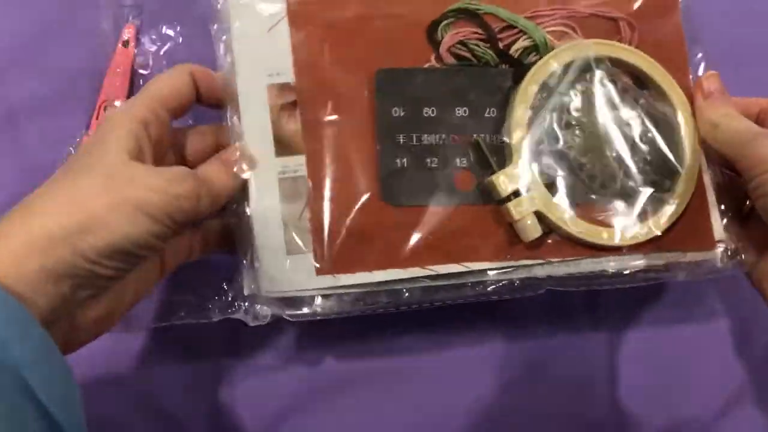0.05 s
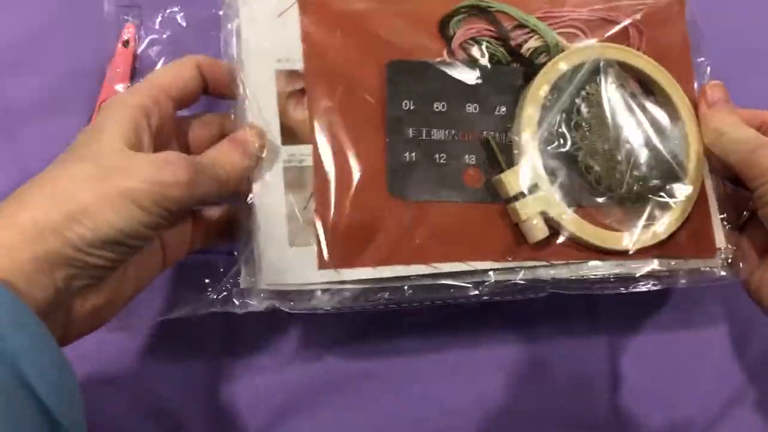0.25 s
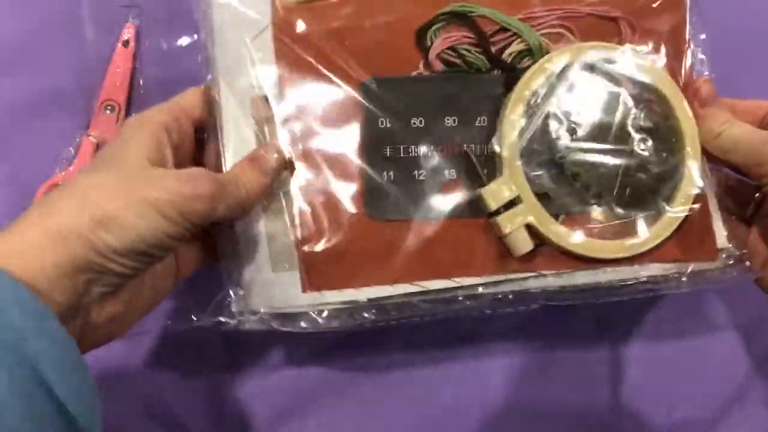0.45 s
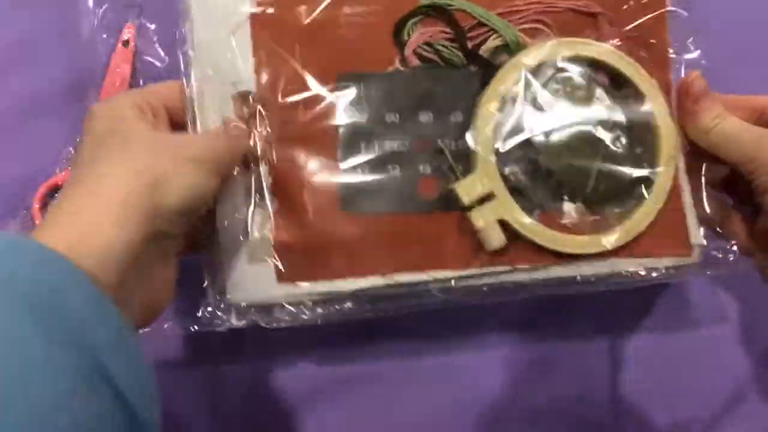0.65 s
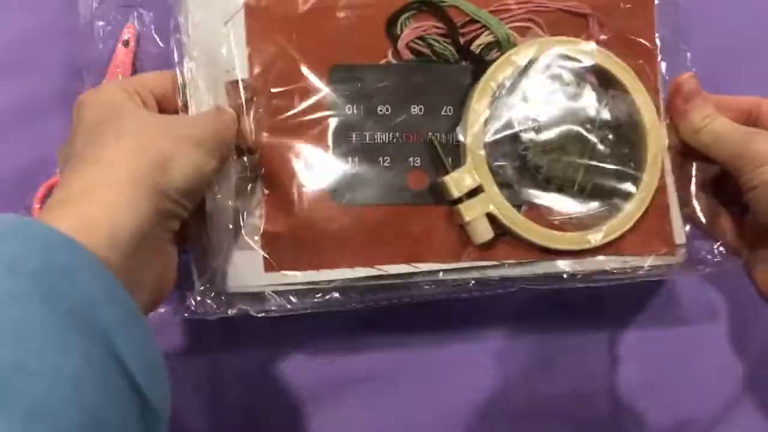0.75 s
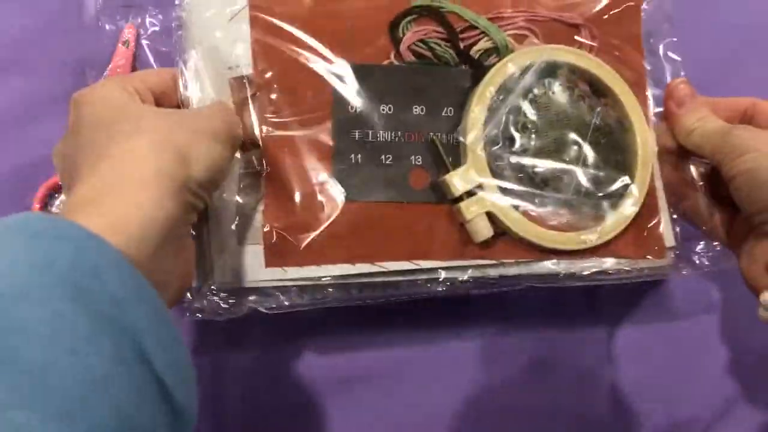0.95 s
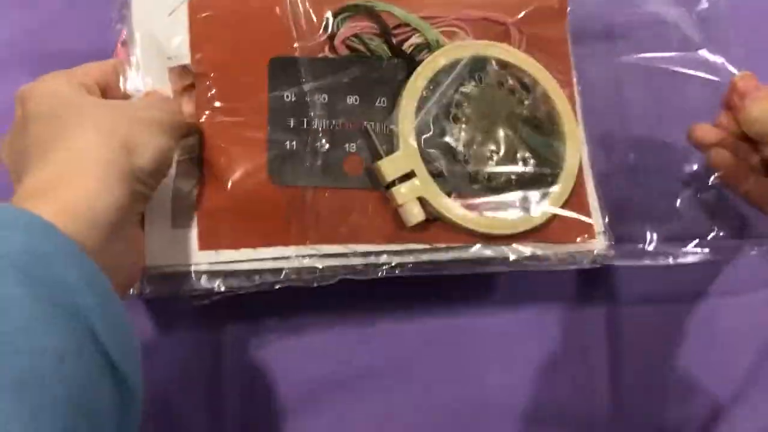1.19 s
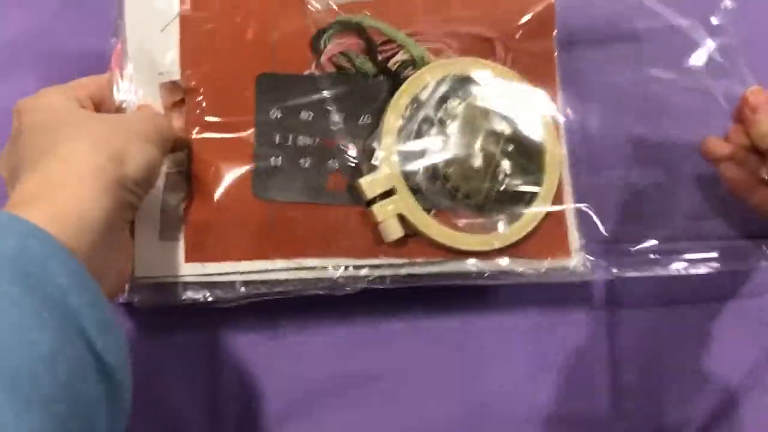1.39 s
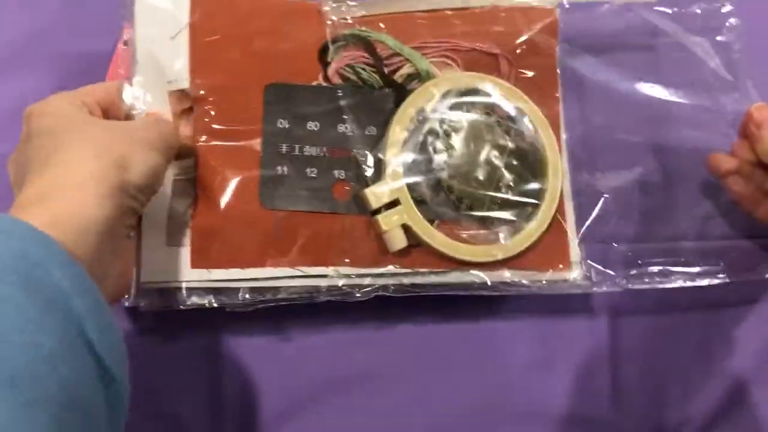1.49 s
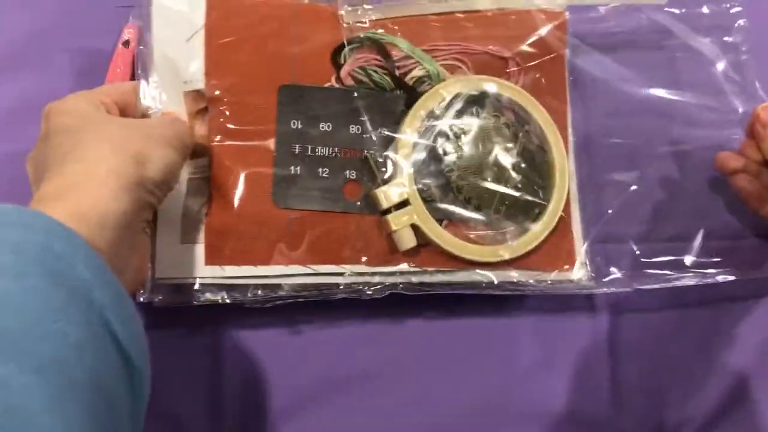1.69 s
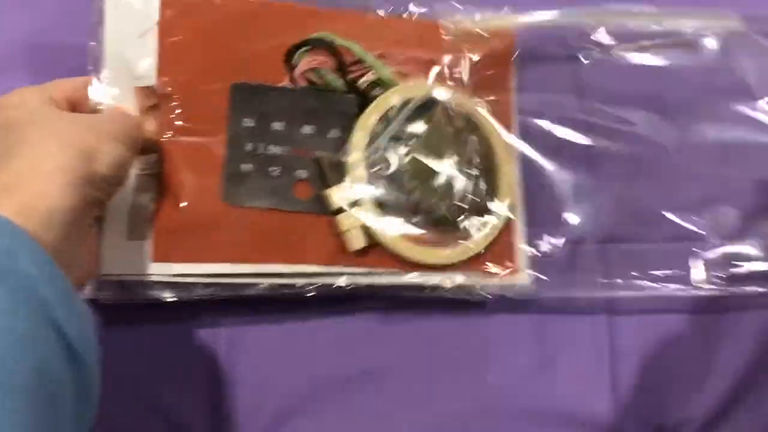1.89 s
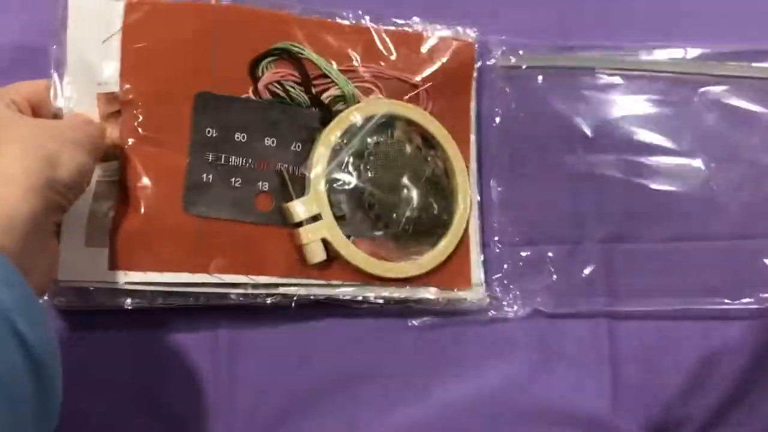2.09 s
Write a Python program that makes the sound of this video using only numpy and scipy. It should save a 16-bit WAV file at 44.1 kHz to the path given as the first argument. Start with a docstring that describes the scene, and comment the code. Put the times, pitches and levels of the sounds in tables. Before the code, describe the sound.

A stiff clear plastic bag crinkles sharply in hands, snapping and rustling close by in a room

```python
"""Creases in a clear, stiff plastic bag buckle with sharp snaps as two hands slide a craft kit out of it, close by.
Each snap rings random film modes; broad panels flip over with dull pops, decaying within a few cycles.
While the contents slide, swelling noise makes the film hiss and the packet rustle low, and tiny rings crackle.
Stray ticks persist between slides. Echoes and a short tail form a small, dry room with faint rumble and air."""
import sys
import numpy as np
from scipy import signal
from scipy.fft import rfft, irfft, next_fast_len
from scipy.io import wavfile
from scipy.ndimage import map_coordinates

SR = 44100
rng = np.random.default_rng(int(sys.argv[2]) if len(sys.argv) > 2 else 0)


def digitize_waveform(pressure):
    """Quantize a signal to 16-bit integers and store it at the path in sys.argv[1].

    Rows of a 2-D input are taken as channels; values are limited to [-1, 1].
    """
    field = np.atleast_2d(pressure).T
    bounded = np.clip(field, -1, 1)
    quanta = np.round(bounded * 32767).astype(np.int16)
    wavfile.write(sys.argv[1], SR, quanta)


N = 94329

# Buckling creases: start_s, level_db, bright_edge_db (against the crack), pitch_hz
CREASE_SNAPS = [(0.06, -40, -13, 5330), (0.0881, -36.5, -16, 6400), (0.0961, -31, -10.0, 6440),
                (0.0994, -40, -16, 6860), (0.155, -41, -19, 4470), (0.1642, -30, -4, 5300),
                (0.1787, -31, 3.0, 6140), (0.2222, -31.0, -9.5, 4700), (0.2315, -45, -11, 4500),
                (0.2511, -26.5, -22.0, 6140), (0.2736, -29, -1, 4160), (0.2787, -25, -7.5, 4870),
                (0.2854, -28.5, -30, 6200), (0.3057, -38, -5.0, 4000), (0.314, -36.5, -7.0, 4000),
                (0.3185, -22.5, -5, 5200), (0.3317, -35.5, -22.0, 2620), (0.3367, -29, 4.5, 3600),
                (0.3432, -29, 2, 6100), (0.3639, -27, -23, 5140), (0.394, -27.5, -16, 4500),
                (0.415, -33.5, -0.5, 4660), (0.421, -42, -16, 3860), (0.5133, -29.5, -18, 7740),
                (0.5245, -30, 0, 3850), (0.543, -36, -20.0, 6200), (0.5609, -42, -4, 2000),
                (0.5718, -37.5, -3, 5800), (0.5853, -36.5, -22.0, 4000), (0.595, -30.5, -6, 3830),
                (0.615, -27, -8.0, 4740), (0.618, -27.5, -3, 4470), (0.6369, -44, 8, 5000),
                (0.6495, -32.5, -3, 2140), (0.6612, -32, -14, 6150), (0.6658, -37, -4.0, 4700),
                (0.6891, -38.5, -1, 3400), (0.6925, -34.5, 0.5, 3340), (0.6993, -37, -2, 3200),
                (0.7166, -41.5, 6, 4930), (0.7505, -33.5, -28, 2370), (0.759, -34, -27, 5300),
                (0.7795, -39.5, -15, 4540), (0.7966, -32, -3, 4370), (0.8096, -42.0, -13, 7300),
                (0.8299, -34, -4, 4770), (0.8316, -34, -9, 3300), (0.8437, -30, 0.5, 5600),
                (0.8611, -38, 2, 5500), (0.9046, -35.5, -26, 4670), (0.9197, -31.5, -6, 1990),
                (0.9248, -38, -11, 6900), (0.9394, -26, -2, 4500), (0.948, -31.5, 3.5, 4970),
                (0.959, -30, 4, 1760), (0.9738, -26, -2.5, 6900), (0.993, -24.5, -14, 6060),
                (1.0063, -28, 2, 2780), (1.0212, -25.5, -4, 5700), (1.0368, -25.5, -10, 5160),
                (1.0607, -30, -22.0, 7200), (1.067, -24.5, -26, 7900), (1.0832, -30.5, -24, 6840),
                (1.1387, -38, -2.5, 4000), (1.1448, -38, -19, 3900), (1.2108, -35, -22, 5400),
                (1.2164, -38.5, -9.0, 4700), (1.2583, -25.5, -12, 5670), (1.2728, -33, -22.0, 4500),
                (1.2917, -44, -3, 2930), (1.3428, -45.5, 7, 3130), (1.4296, -49, -10, 3400),
                (1.47, -40.5, -20, 8150), (1.474, -46, -22.0, 3100), (1.4924, -38.0, 5.5, 4270),
                (1.5317, -35.5, -24, 8700), (1.5468, -42.5, -1.0, 6060), (1.616, -49, -14.0, 1800),
                (1.6641, -36, -8.0, 4460), (1.7003, -41, -14, 3820), (1.7266, -32.5, 1.0, 5100),
                (1.76, -30, -22.0, 4900), (1.7744, -29, -8, 3700), (1.8293, -31, -19, 4470),
                (1.8608, -35.5, -18.0, 3600), (1.869, -34, 0, 3380), (1.892, -33, -8, 5800),
                (1.9657, -31.5, -17, 5300), (2.0426, -32.0, -19, 3500), (2.0541, -39.5, -13, 3400),
                (2.0779, -26.5, 0.0, 5450)]
# Spectrum of a crack: pitch_multiple (ratio), relative_level_db
CRACK_SPECTRUM = [(.1, -22.5), (.35, -9), (.7, -5.5), (1, 0), (1.45, -4.5), (3, -22)]
# Spectrum of the bright edge: frequency_hz, relative_level_db
EDGE_SPECTRUM = [(1000, -44), (5500, -8), (8000, 2), (16000, 3.5)]
CRACK_T60_S, EDGE_T60_S = 0.0059, 0.0093  # 60 dB decay of a mode at MODE_MID_HZ
REBOUND_DB, REBOUND_MAX_S = -10.5, 0.0026  # a crease settles with a weaker crack within this time

# Film modes: those above the middle frequency start and die sooner; the rise is for a mode at the middle
MODE_LOW_HZ, MODE_HIGH_HZ, MODE_MID_HZ, MODE_RISE_S = 358, 15980, 4240, 0.00018

# Broad panels of film flipping over: start_s, level_db, pitch_hz
PANEL_POPS = [(0.155, -47, 850), (0.2235, -46, 1040), (0.276, -42, 1940), (0.3155, -44, 1340),
              (0.3655, -41, 2150), (0.3948, -38.5, 1130), (0.525, -47, 407), (0.6173, -46, 1900),
              (0.6497, -49, 550), (0.6897, -35, 900), (0.6925, -47, 586), (0.6992, -51.5, 444),
              (0.8295, -45.5, 620), (0.9195, -37.5, 1190), (1.2109, -41.5, 1130), (1.2584, -43.5, 505),
              (1.507, -44.5, 2270), (1.6399, -45.5, 1750), (1.658, -42, 1580), (2.08, -45, 303)]
POP_T60_CYCLES, POP_SPREAD_OCT = 5.4, 0.42  # decay by 60 dB; reach of the modes either side of the pitch

# Film sliding over the contents: start_s, attack_s, hold_s, release_s, level_db, body_db (over the usual)
FILM_SLIDES = [(0.073, 0.013, 0.0074, 0.032, -48.5, -12), (0.215, 0.065, 0.067, 0.049, -53, 2),
               (0.437, 0.073, 0.021, 0.058, -47, 1), (.55, 0.052, 0.015, 0.16, -47.5, 0.5),
               (0.745, 0.027, 0.016, 0.051, -54.5, 6.5), (0.814, 0.025, 0.031, 0.14, -52, 2.5),
               (0.93, 0.029, 0.055, 0.12, -32, -5), (1.037, 0.032, 0.023, 0.082, -48, 7),
               (1.22, 0.032, 0.01, 0.062, -54, 12.5), (1.276, 0.043, 0.082, 0.022, -50, 0),
               (1.705, 0.025, 0.084, 0.15, -39, -3.5), (1.755, 0.019, 0.011, 0.015, -33.5, -3.5),
               (1.837, 0.028, 0.075, 0.14, -47, -3.5), (1.941, 0.041, .012, 0.072, -45, 6)]
RISE_DB, FALL_DB = 19, 31.5  # level change in one attack time and in one release time
HISS_DB, FINE_DB, BODY_DB = -8.5, -4.5, -9  # parts of a slide, against its level
# Spectrum of the sliding hiss: frequency_hz, relative_level_db
HISS_SPECTRUM = [(200, -35), (700, -5.5), (2000, -2.5), (4500, -0.5), (8000, -6), (15600, -10),
                 (16600, -40)]
# Spectrum of the fine crackle: frequency_hz, relative_level_db
FINE_SPECTRUM = [(300, -13), (900, -8), (2200, -5.5), (7000, 5), (12000, -1), (15600, -0.5), (16800, -45)]
# Spectrum of the packet's low rustle: frequency_hz, relative_level_db
BODY_SPECTRUM = [(40, -38), (110, -7), (250, -3), (450, -1.5), (700, -3), (2000, 1), (5000, -29)]
FINE_PER_S, TICKS_PER_S = 700, 170  # mean rates of the fine crackle and of the stray ticks
CRACKLE_SPREAD_DB, CRACKLE_T60_S = 6, 0.0033  # tiny cracks of both kinds; decay at MODE_MID_HZ
TICK_DB, IDLE_DB = -48, -79  # ticks at average strain; film level that drives them between slides
TICK_EXPONENT = 0.5  # how far the ticks follow the strain
# Spectrum of the stray ticks: frequency_hz, relative_level_db
TICK_SPECTRUM = [(200, -23.5), (1000, -2), (2400, 1.5), (5500, 0), (16000, -19.5)]

# Room reflections: level against the direct sound ahead of the room spectrum
ROOM_DB, ROOM_T60_S, ROOM_DELAY_S = -18.5, 0.15, 0.0019
WALLS_DB, WALLS_NEAR_S, WALLS_FAR_S = -17, 0.002852, .013
# Spectrum of the reflected sound: frequency_hz, relative_level_db
ROOM_SPECTRUM = [(330, 9), (900, 1), (6000, -4.5), (16000, -7.5)]

RUMBLE_DB, AIR_DB = -70, -68.5  # ahead of the recorder's filters
# Spectrum of the low rumble: frequency_hz, relative_level_db
RUMBLE_SPECTRUM = [(25, -45), (60, -5.5), (150, 2.5), (260, -3), (700, -30.5)]
# Spectrum of the faint air: frequency_hz, relative_level_db
AIR_SPECTRUM = [(600, 1.5), (1500, -3), (16000, -30)]
LOW_CUT_HZ, TOP_HZ = 41, 16700  # recorder: 3 dB down at the low cut, silent from the top


def snaps():
    """Buckling instability: each crease excites a crack around its pitch, a bright edge and a rebound."""
    out = np.zeros(N)
    t = np.arange(SR // 80) / SR
    for s, db, bright_db, hz in CREASE_SNAPS:
        crack = film_ring(t, CRACK_T60_S, count=28)
        rebound = film_ring(t, CRACK_T60_S, count=12)
        add(crack, REBOUND_MAX_S * rng.random(), amp(REBOUND_DB) * rebound)
        spectrum = [(hz * multiple, level) for multiple, level in CRACK_SPECTRUM]
        crack = blip(colour(crack, spectrum))
        edge = blip(colour(film_ring(t, EDGE_T60_S, count=24), EDGE_SPECTRUM))
        add(out, s, amp(db) * (crack + amp(bright_db) * edge))
    return out


def film_ring(t, t60, count):
    """Modal superposition: a patch of film rings in random modes; high ones start and die sooner."""
    place, phase, size = rng.random((3, count, 1))
    # squared spacing crowds the modes towards the low end
    position = (np.arange(count)[:, None] + place) / count
    hz = MODE_LOW_HZ + (MODE_HIGH_HZ - MODE_LOW_HZ) * position ** 2
    age = t * np.sqrt(hz / MODE_MID_HZ)
    modes = size * np.sqrt(hz) * np.sin(2 * np.pi * (hz * t + phase))
    envelope = fade(age, t60) * (1 - fade(age, MODE_RISE_S))
    return blip(np.sum(modes * envelope, axis=0))


def pops():
    """Damped panel resonance: decay is fixed in cycles, so a larger, lower panel rings longer."""
    out = np.zeros(N)
    t = np.arange(SR // 30) / SR
    ratios = 2 ** (POP_SPREAD_OCT * np.linspace(-1, 1, 3)[:, None])
    for s, db, hz in PANEL_POPS:
        cycles = hz * t * ratios
        envelope = np.sqrt(cycles) * fade(cycles, POP_T60_CYCLES)
        phase = rng.random((len(cycles), 1))
        modes = envelope * np.sin(2 * np.pi * (cycles + phase))
        add(out, s, amp(db) * blip(modes.sum(axis=0)))
    return out


def sliding():
    """Friction noise: each slide swells, holds and dies, driving hiss, crackle, ticks and low rustle."""
    t, film, body = np.arange(N) / SR, np.zeros(N), np.zeros(N)
    for s, attack, hold, release, db, body_db in FILM_SLIDES:
        rise = np.minimum((t - s) / attack - 1, 0)
        fall = np.maximum(t - s - attack - hold, 0) / release
        level = amp(db + RISE_DB * rise - FALL_DB * fall)
        # overlapping slides add in power
        film = np.hypot(film, level)
        body = np.hypot(body, level * amp(body_db))
    grip = unit(amp(2.24 * wobble(170)))  # uneven friction
    idle = amp(IDLE_DB) * (t > CREASE_SNAPS[0][0])  # from the first crease onwards
    strain = unit(np.hypot(film, idle)) ** TICK_EXPONENT
    ticks = amp(TICK_DB) * strain * crackle(TICKS_PER_S, TICK_SPECTRUM, count=600)
    hiss = amp(HISS_DB) * noise(HISS_SPECTRUM)
    fine = amp(FINE_DB) * unit(crackle(FINE_PER_S, FINE_SPECTRUM, count=2400))
    rustle = amp(BODY_DB) * noise(BODY_SPECTRUM)
    return ticks + grip * (film * (hiss + fine) + body * rustle)


def crackle(per_s, points, count):
    """Poisson process: independent tiny cracks of unequal size ring many different patches of film."""
    out = np.zeros(N)
    t = np.arange(SR // 200) / SR
    patches = [film_ring(t, CRACKLE_T60_S, count=14) for _ in range(100)]
    times = np.cumsum(rng.exponential(1 / per_s, count))
    sizes = amp(CRACKLE_SPREAD_DB * np.minimum(rng.standard_normal(count), 1.5))
    choices = rng.integers(len(patches), size=count)
    for s, size, patch in zip(times, sizes, choices):
        add(out, s, size * patches[patch])
    return colour(out, points)


def room(x):
    """Reflection and reverberation: near echoes and a short tail, whose pattern shifts as the bag moves."""
    t, out = np.arange(SR // 4) / SR, np.zeros(N)
    step = SR // 15  # a new pattern for each short block
    for start in range(0, N, step):
        tail = rng.standard_normal(len(t)) * fade(t, ROOM_T60_S) * (t > ROOM_DELAY_S)
        walls = np.zeros(len(t))
        for place, size in rng.random(size=(8, 2)):
            delay = WALLS_NEAR_S + place * (WALLS_FAR_S - WALLS_NEAR_S)
            add(walls, delay, np.array([size - .5]))
        late = amp(ROOM_DB) * tail / np.linalg.norm(tail)
        early = amp(WALLS_DB) * walls / np.linalg.norm(walls)
        add(out, start / SR, signal.fftconvolve(x[start:start + step], late + early))
    return colour(out, ROOM_SPECTRUM)


def background():
    """Stationary random noise: the low rumble and faint air of the room."""
    rumble = amp(RUMBLE_DB) * noise(RUMBLE_SPECTRUM)
    air = amp(AIR_DB) * noise(AIR_SPECTRUM)
    return rumble + air


def amp(db):
    """Logarithmic level: decibels to amplitude gain."""
    return 10 ** (np.asarray(db) / 20)


def unit(x):
    """Power normalisation: scale to rms 1."""
    return x / np.sqrt(np.mean(x ** 2) + 1e-20)


def wobble(rate):
    """Slow random modulation: a smooth curve through rate random knots a second."""
    knots = rng.standard_normal(int(N * rate / SR) + 4)
    return map_coordinates(knots, [np.arange(N) * rate / SR])


def colour(x, points):
    """Minimum-phase filtering: a causal spectrum through the points that keeps white-noise power."""
    size = 2 * next_fast_len(len(x) // 2 + 2048)
    hz, db = np.transpose(points)
    grid = np.fft.rfftfreq(size, 1 / SR)
    gain = unit(amp(np.interp(np.log(grid + 1), np.log(hz), db)))
    # folding the cepstrum onto positive time makes the filter causal
    cepstrum = irfft(np.log(np.maximum(gain, 1e-6)))
    cepstrum[1:size // 2] *= 2
    cepstrum[size // 2 + 1:] = 0
    return irfft(rfft(x, size) * np.exp(rfft(cepstrum)))[:len(x)]


def noise(points):
    """Spectral shaping: coloured Gaussian noise of rms 1."""
    return unit(colour(rng.standard_normal(N), points))


def fade(t, t60):
    """Exponential damping: decay by 60 dB in t60."""
    return np.exp(-np.log(1000) * t / t60)


def blip(x):
    """Energy normalisation: scale a short sound to the energy of one millisecond at rms 1."""
    return x * np.sqrt(SR / 1000 / (np.sum(x ** 2) + 1e-20))


def add(track, s, sound):
    """Linear superposition: mix a sound into the track at time s in seconds."""
    part = track[max(0, round(s * SR)):][:len(sound)]
    part += sound[:len(part)]


def scene():
    """Superposition of direct, reflected and background sound, in mono."""
    bag = snaps() + pops() + sliding()
    return (bag + room(bag) + background())[None]


def record(dry):
    """Band limitation: the recorder rolls off the deepest bass and keeps nothing above its limit."""
    size = next_fast_len(N + SR // 2)
    hz = np.fft.rfftfreq(size, 1 / SR)
    low_cut = hz ** 3 / np.hypot(hz ** 3, LOW_CUT_HZ ** 3)
    return irfft(rfft(dry, size) * low_cut * (hz < TOP_HZ), size)[:, :N]


dry = scene()
out = record(dry)
digitize_waveform(out)
```